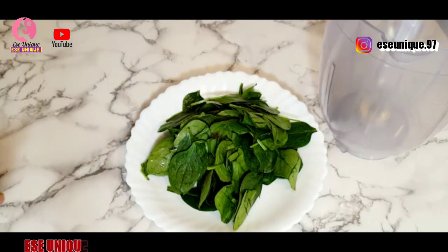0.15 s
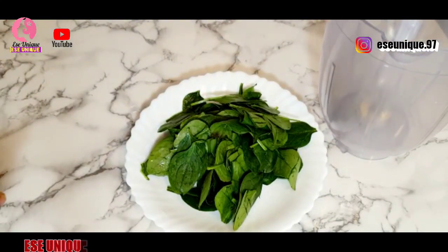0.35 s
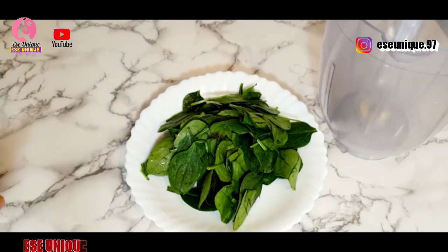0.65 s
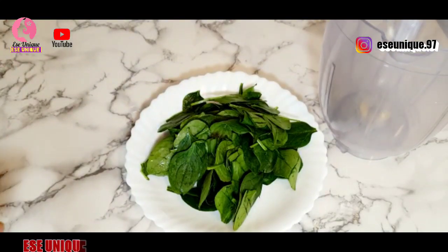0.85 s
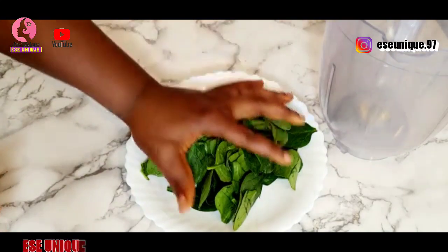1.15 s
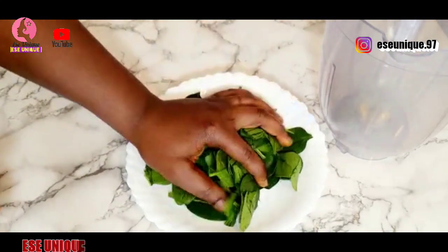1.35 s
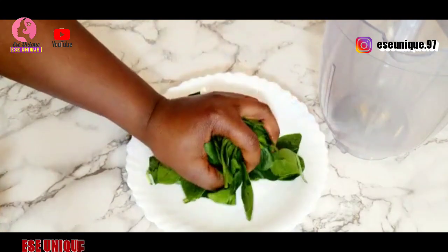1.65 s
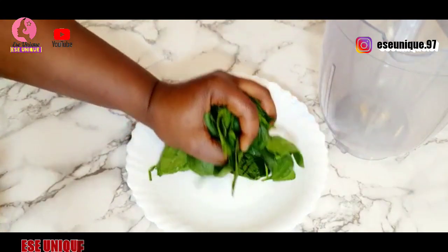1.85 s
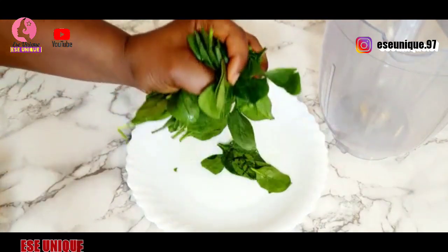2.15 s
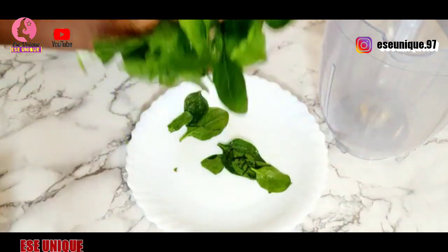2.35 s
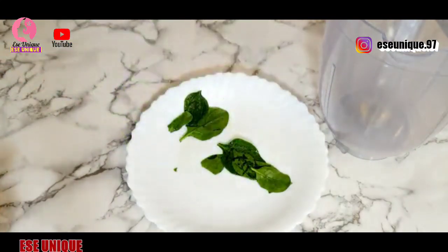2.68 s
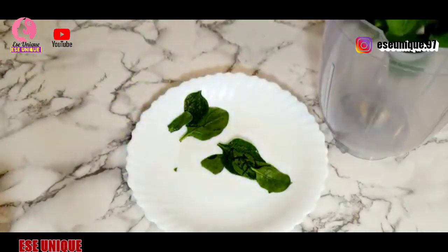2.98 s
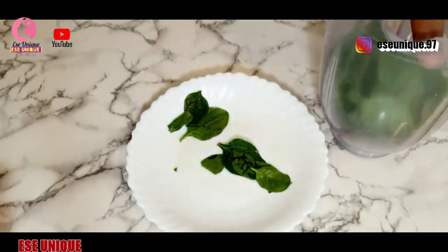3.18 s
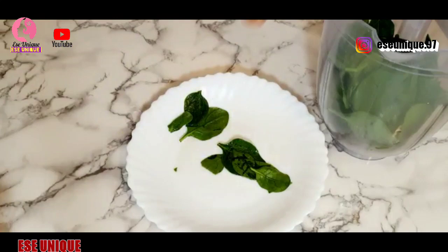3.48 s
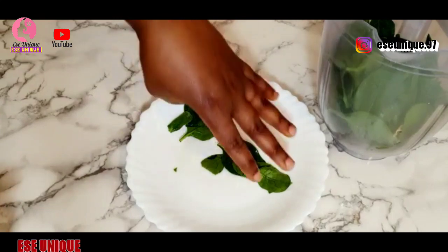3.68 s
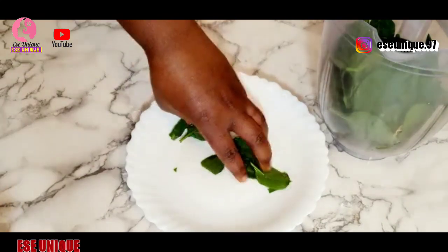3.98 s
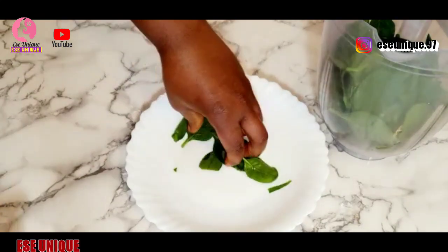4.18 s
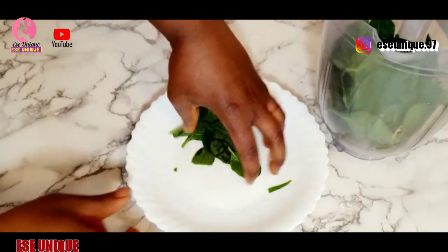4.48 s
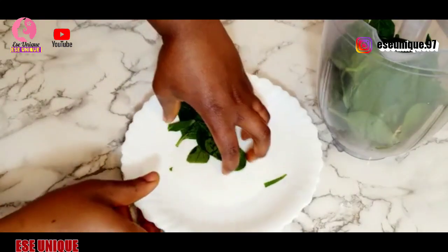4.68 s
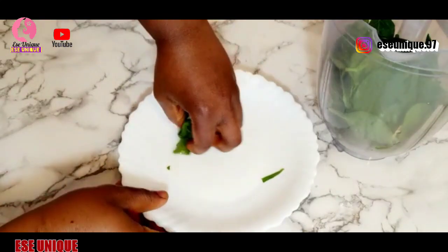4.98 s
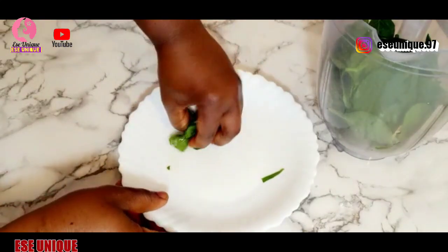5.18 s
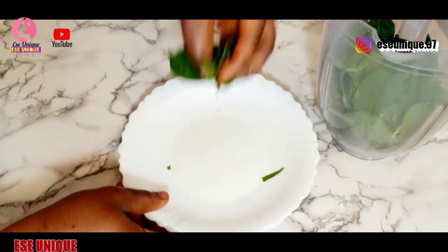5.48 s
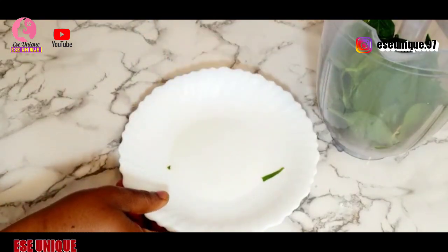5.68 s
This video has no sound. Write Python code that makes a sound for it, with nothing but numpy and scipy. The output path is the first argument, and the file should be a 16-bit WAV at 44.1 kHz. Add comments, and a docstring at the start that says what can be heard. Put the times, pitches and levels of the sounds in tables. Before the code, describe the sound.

Fresh leaves crunch and crackle in a squeezing hand, then drop into a plastic jar with a hollow clack and thud; a distant horn toots first.

```python
"""In a hard-walled kitchen, fresh spinach is gathered from a plate by hand and pushed into a plastic blender jar.
Leaves crackle as clouds of tiny filtered clicks, brighter as the fist closes; stems snap and crunch, wet leaves
squeak and the plate sings. The jar clacks and knocks hollowly, ringing worktop and room as decaying modes.
At the start a distant car horn toots twice in fluttering partials; later a faint tone sinks in pitch.
Low noise and the wavering hum of an appliance run throughout."""
import sys
import numpy as np
from scipy import signal
from scipy.fft import rfft, irfft
from scipy.io import wavfile
from scipy.ndimage import uniform_filter1d, map_coordinates

SR = 44100
rng = np.random.default_rng(int(sys.argv[2]) if len(sys.argv) > 2 else 0)


def materialize(psi):
    """Save the field psi as 16-bit PCM at rate SR to the path in sys.argv[1].

    A 1-D psi becomes a single channel; in a 2-D psi each row is a channel.
    """
    bounded = np.clip(np.atleast_2d(psi).T, -1, 1)
    quanta = np.round(bounded * 32767).astype(np.int16)
    wavfile.write(sys.argv[1], SR, quanta)


N = 257676
TIME = np.arange(N) / SR
RELEASE_DB_PER_S = 329.5  # leaves come to rest once the hand stops

# heavy and faint bumps on the counter: start_s, relative bump_db, highest pitch excited top_hz, relative boom_db
COUNTER_BUMPS = [(0.519, -17.5, 348, -23.5), (0.535, -36, 119.4, -10), (0.876, -22.5, 450, -28),
                 (0.887, -19.5, 170, -12), (0.92, -34, 111, -11), (3.136, -12, 392, -11.5),
                 (3.191, 3.5, 690, 0), (3.219, 4, 500, 0), (3.258, -2.5, 455, -3), (3.979, -32, 121, -25.5),
                 (4.525, -23, 149, -28)]


def amp(db):
    """Decibels to gain."""
    return 10 ** (np.asarray(db) / 20)


def unit(x):
    """Scale to rms 1."""
    return x / np.sqrt(np.mean(x ** 2) + 1e-20)


def at_hz(points, hz):
    """Read a table along a log-frequency axis."""
    f, value = np.transpose(points)
    return np.interp(np.log(hz + 1e-3), np.log(f), value)


def cut(x, hz, kind, order=2):
    """Butterworth filter."""
    sections = signal.butter(order, np.clip(hz, 10, .45 * SR), kind, fs=SR, output="sos")
    return signal.sosfilt(sections, x + 1e-18)


def drift(rate, size=N):
    """Smooth random motion with rms 1, passing `rate` random knots per second."""
    knots = rng.standard_normal(4096)
    coarse = map_coordinates(knots, [TIME[:size:16] * rate], order=3, mode="wrap")
    return unit(coarse).repeat(16)[:size]


def coloured(x, spectrum, size=4096):
    """Causal (minimum-phase) filter with the given spectrum shape and unit energy."""
    cepstrum = irfft(np.log(amp(at_hz(spectrum, np.fft.rfftfreq(size, 1 / SR)))))
    # folding the cepstrum forward makes the filter minimum-phase
    cepstrum[1:size // 2] *= 2
    cepstrum[size // 2 + 1:] = 0
    response = irfft(np.exp(rfft(cepstrum)))
    return signal.fftconvolve(x, response / np.linalg.norm(response))[:len(x)]


def diffuse(size):
    """Stereo noise from all round: alike in the bass, unrelated to slightly opposed in the treble."""
    # left-right likeness: pitch_hz, correlation (-1 to 1)
    likeness = [(60, 0.93), (130, 1), (260, 0.59), (500, 0.37), (900, 0.1), (2000, -0.068), (16000, -0.41)]
    alike = np.clip(at_hz(likeness, np.fft.rfftfreq(size, 1 / SR)), -1, 1)
    mid, side = rfft(rng.standard_normal((2, size)))
    return irfft(np.sqrt(1 + alike) * mid + np.sqrt(1 - alike) * side * [[1], [-1]], size)


def burst(t60, size=8192):
    """A contact: a dying run of tiny slips with unit energy."""
    slips = rng.choice([-1, 1], size) * rng.uniform(.5, 1, size)
    slips = slips * amp(-60 * TIME[:size] / max(t60, 1e-3))
    return slips / np.linalg.norm(slips)


def envelope(s, length_s, swell_s, release_db_per_s):
    """Swell evenly from time s, hold to the end of the length, then die away."""
    swell = np.clip((TIME - s) / max(swell_s, 1e-3), 0, 1)
    return swell * amp(-release_db_per_s * np.maximum(TIME - s - length_s, 0))


def add(track, s, sound):
    """Mix a sound in at time s."""
    start = max(round(s * SR), 0)
    track[..., start:start + sound.shape[-1]] += sound[..., :N - start]


def kitchen(x, wet_db, smear_s, pan_db, lag_s, gap_s=0.00069, swell_s=0.0047, size=32768):
    """Two spaced microphones hear the direct sound, then the room dying band by band."""
    # decay of the room: pitch_hz, t60_s
    room_decay = [(60, 0.56), (250, 0.37), (1000, 0.4), (4000, 0.31), (8000, 0.3), (16000, 0.3)]
    t, hz = TIME[:size], np.fft.rfftfreq(size, 1 / SR)
    noise, tail = rfft(diffuse(size)), 0
    edges = np.geomspace(20, SR / 2, 11)
    for low, high in zip(edges, edges[1:]):
        band = irfft(noise * ((hz >= low) & (hz < high)))
        tail = tail + band * amp(-60 * t / at_hz(room_decay, np.sqrt(low * high)))
    build_up = 1 - np.exp(-np.maximum(t - gap_s, 0) / swell_s)
    tail = unit(tail * build_up) / np.sqrt(size)
    # short waves reach each microphone by detours round hand and jar, each pitch a little late
    knots = np.linspace(0, SR / 2, num=40)
    detour = np.array([np.interp(hz, knots, rng.exponential(smear_s, len(knots)) * (knots > 0))
                       for _ in "LR"])
    late = detour + [[abs(lag_s)], [0]]  # the left side hears it later
    direct = irfft(np.exp(-2j * np.pi * np.cumsum(late, axis=1) * SR / size))
    direct[:, size // 2:] = 0
    panned = direct * amp([[pan_db / 2], [-pan_db / 2]])
    heard = signal.fftconvolve(np.atleast_2d(x), panned + amp(wet_db) * tail, axes=1)[:, :N]
    return heard / np.hypot(1, amp(wet_db))


def background(noise_db=-53.5, hum_db=6.0, waver=0.63):
    """Low room noise with an appliance's hum, each line wavering in strength and phase."""
    # spectrum shape of the room noise: pitch_hz, density_db per Hz
    noise_colour = [(12, -43), (20, -8), (48, 0.5), (70, -7), (107, 2.5), (170, -4.5), (225, -8.5),
                    (320, -6.5), (400, -11.5), (470, -16.5), (560, -14), (660, -15), (873, -24),
                    (1100, -29), (1400, -25), (2400, -28), (3200, -33), (16000, -45.5)]
    # hum lines of the appliance: pitch_hz, relative level_db
    hum_lines = [(102.3, -73), (355.3, -72.5), (446.8, -69), (495.3, -73), (656.8, -78.5), (1680, -87.5)]
    noise = unit(np.array([coloured(side, noise_colour) for side in diffuse(N)]))
    hum = 0
    for hz, db in hum_lines:
        wavering = 1 + waver * (drift(8.7) + 1j * drift(6.6))
        hum = hum + amp(db) * np.real(wavering * np.exp(2j * np.pi * hz * TIME))
    return amp(noise_db) * noise + amp(hum_db) * hum


def drone(level_db=-49.5, waver_db=2.0):
    """One faint, wavering tone swells, sinks in pitch and fades."""
    start_s, swell_s, fade_db_per_s = 5.03, 0.14, 29
    start_hz, sink_hz_per_s = 343, 13
    hz = start_hz - sink_hz_per_s * (TIME - start_s)
    shape = envelope(start_s, swell_s, swell_s, fade_db_per_s)
    return shape * amp(level_db + waver_db * drift(5.6)) * np.sin(2 * np.pi * np.cumsum(hz) / SR)


def horn(flutter_per_s=16, size=40000):
    """A far-off buzzing diaphragm sags as each toot ends; street echoes build up and partials flutter."""
    # toots: start_s, length_s, swell_s, relative level_db, brightening_db per partial above the third,
    # flutter share of the direct sound
    toots = [(0, .142, .003, -44, 0, .15), (.292, .158, .035, -48, 1.4, .35)]
    # partials: multiple of the pitch, relative direct_db, relative street echo_db
    partials = [(1, -12, -12), (2, -19, -11), (3, -1, -17), (4, -9, -17), (5, -22, -25), (6, -30, -32),
                (7, -37, -37)]
    pitch_hz, release_db_per_s = 432.5, 600
    sag_hz_per_s, sag_s = 450, .025
    echo_release_db_per_s, echo_flutter = 170, .6
    # the direct sound of the middle partials dips briefly during the second toot
    dip_s, dip_width_s, dipping = .402, .022, (3, 4)
    out, t = np.zeros((2, N)), TIME[:size]
    for s, length_s, swell_s, db, bright_db, flutter_share in toots:
        loud = envelope(s, length_s, swell_s, release_db_per_s)[:size]
        echo = envelope(s, length_s + sag_s, length_s, echo_release_db_per_s)[:size]
        sag = np.cumsum(sag_hz_per_s * np.clip(t - s - length_s + sag_s / 2, 0, sag_s)) / SR
        for k, direct_db, echo_db in partials:
            flutter = np.array([drift(flutter_per_s, size) + 1j * drift(flutter_per_s, size) for _ in "LR"])
            dip = 1 - (k in dipping) * np.exp(-((t - dip_s) / dip_width_s) ** 2)
            direct = amp(direct_db) * dip * loud * (1 + flutter_share * flutter)
            direct = direct * np.exp(-2j * np.pi * k * sag)
            reflected = amp(echo_db) * echo * (1 - echo_flutter + echo_flutter * flutter[::-1])
            arriving = direct + 1j * reflected
            partial = arriving * np.exp(2j * np.pi * (k * pitch_hz * t + rng.random()))
            add(out, 0, np.sqrt(2) * amp(db + bright_db * max(k - 3, 0)) * np.real(partial))
    return out


def boom(level_db=-14.0, swell_s=0.0043, port_lag_s=0.00023, size=40000):
    """After each bump the standing waves of counter and room build up and ring on."""
    # modes of counter and room: pitch_hz, relative level_db, t60_s
    room_modes = [(51.7, -19.5, 0.55), (101.1, -5, 0.51), (111.8, 0, 0.14), (177.6, -13, 0.48),
                  (211, -6.5, 0.26), (259.2, -5, 0.33), (329.2, -1.5, 0.27), (364, -8.5, 0.4),
                  (444.8, -2.5, 0.36), (500.4, -4, 0.35), (566, -16, .42), (738, -17, 0.43),
                  (916, -22, 0.27)]
    out, t = np.zeros((2, N)), TIME[:size]
    at_ports = t - np.array([[port_lag_s], [0]])  # the left side hears it later
    for s, _, top_hz, boom_db in COUNTER_BUMPS:
        for hz, mode_db, t60 in room_modes:
            strength = amp(boom_db + mode_db + level_db) / np.hypot(1, (hz / top_hz) ** 3)
            shape = (1 - np.exp(-t / swell_s)) * amp(-60 * t / t60)
            add(out, s, strength * shape * np.sin(2 * np.pi * (hz * at_ports + rng.random())))
    return out


def knocks(swell_s=0.0032, size=16384):
    """A light knock rings the low modes of the worktop, weakening above its own highest pitch."""
    # knocks: start_s, relative level_db, highest pitch excited top_hz
    light_knocks = [(0.519, -39, 600), (0.556, -44, 450), (0.891, -34.5, 560), (0.928, -38.5, 480)]
    # worktop resonances: pitch_hz, relative level_db, t60_s
    worktop_modes = [(172.4, 2, .13), (349, -1.5, 0.155), (461, -4, 0.2), (627, -8.5, .1), (870, -15, .15)]
    out, t = np.zeros(N), TIME[:size]
    for s, db, top_hz in light_knocks:
        for hz, mode_db, t60 in worktop_modes:
            strength = amp(db + mode_db) / np.hypot(1, (hz / top_hz) ** 3)
            shape = (1 - np.exp(-t / swell_s)) * amp(-60 * t / t60)
            add(out, s, strength * shape * np.sin(2 * np.pi * (hz * t + rng.random())))
    return out


def thuds(level_db=28.0, contact_s=0.022):
    """Dull contacts on the counter, heavy and faint, each muffled above its own highest pitch."""
    # spectrum shape of a bump: pitch_hz, density_db per Hz
    bump_colour = [(45, -23), (90, -2.5), (160, -5), (250, -2), (520, 0.5), (800, -4.5), (1400, -1.5),
                   (2600, 9.5), (4000, 5.5), (7000, -5)]
    out = np.zeros(N)
    for s, bump_db, top_hz, _ in COUNTER_BUMPS:
        push = unit(coloured(burst(contact_s), bump_colour))
        push = push / np.sqrt(len(push))  # unit energy
        add(out, s, amp(bump_db + level_db) * cut(push, top_hz, "low"))
    return out


def hollow(level_db=-6.0, size=16384):
    """The landing jar knocks hollowly, its tones sliding down as the leaves pack down."""
    # hollow tones: start pitch_hz, relative level_db, swell_s, t60_s, fall in octaves per s
    hollow_modes = [(276, 1, 0.0007, 0.062, 0.505), (440, -3.5, 0.00083, 0.073, 1.6),
                    (774.5, -5.5, 0.027, 0.3, 13), (1074, -12.5, 0.00084, .05, 1.5),
                    (1150, -18.5, .03, 0.25, 5.7), (1424, -17.5, 0.013, 0.15, 2.7),
                    (2210, -9.5, 0.001, 0.03, 1.5), (2910, -8, .001, 0.038, 1.5),
                    (3680, -10, .001, 0.042, 1)]
    landing_s = 3.1917
    out, t = np.zeros(N), TIME[:size]
    for hz, db, swell_s, t60, fall in hollow_modes:
        turns = np.cumsum(hz * 2 ** (-fall * t)) / SR
        shape = (1 - np.exp(-t / swell_s)) * amp(level_db + db - 60 * t / t60)
        add(out, landing_s, shape * np.sin(2 * np.pi * turns))
    return out


def jar_clacks(level_db=13.0, ring_db=-15.0, size=16384):
    """Plastic chatters against a hard edge and the jar wall rings briefly."""
    # hard plastic contacts: start_s, relative chatter_db, chatter t60_s, relative wall ring_db
    contacts = [(0.517, -37, 0.3, -33.5), (0.874, -22.5, 0.28, -38), (0.882, -24.5, 0.041, -34),
                (3.1331, -4, 0.036, -1), (3.1912, -13, 0.026, -17), (3.224, -15, 0.23, -20)]
    # resonances of the jar wall: pitch_hz, relative level_db, t60_s
    wall_modes = [(1407, -11.5, 0.067), (1797, -11.5, 0.046), (3290, 2, 0.055), (3670, -11.5, 0.047),
                  (4020, -4, 0.035), (4550, -3.5, .04), (4850, -8.5, 0.036)]
    # spectrum shape of the chatter: pitch_hz, density_db per Hz
    chatter_colour = [(500, -36), (1000, -11), (1400, -2.5), (1800, 4), (2500, -6), (3200, 5.5),
                      (3800, 3.5), (4600, 0), (5600, -6), (8300, -9.5), (12000, -16), (16000, -25.5)]
    out, t = np.zeros(N), TIME[:size]
    for s, db, chatter_s, wall_db in contacts:
        add(out, s, amp(db + level_db) * coloured(burst(chatter_s), chatter_colour))
        wall = 0
        for hz, mode_db, t60 in wall_modes:
            wall = wall + amp(mode_db - 60 * t / t60) * np.sin(2 * np.pi * hz * t) * rng.choice([-1, 1])
        add(out, s, amp(wall_db + ring_db) * wall)
    return out


def plate_rub(level_db=1.0, judder_db=4.0):
    """The last leaves drag over the bare plate; their juddering friction keeps it faintly singing."""
    # slides: start_s, length_s, swell_s, relative level_db
    slides = [(4.065, 0.17, .04, -63.5), (4.50, 0.24, 0.025, -65), (4.70, 0.093, .05, -54.5),
              (4.814, .40, 0.072, -52.5)]
    # plate resonances: pitch_hz, width_hz, relative level_db
    plate_modes = [(2165, 110, 7.5), (3780, 170, 2), (5100, 200, -15.5), (6230, 450, 4), (7520, 210, -8)]
    sliding = sum(amp(db) * envelope(s, length_s, swell_s, RELEASE_DB_PER_S)
                  for s, length_s, swell_s, db in slides)
    friction = rng.standard_normal(N) * amp(judder_db * drift(50))
    song = 0
    for hz, width, mode_db in plate_modes:
        ringing = signal.lfilter(*signal.iirpeak(hz, hz / width, fs=SR), friction)
        song = song + amp(mode_db) * unit(ringing)
    return unit(song) * amp(level_db) * sliding


def squeaks(level_db=1.5, jitter=0.029):
    """A wet leaf sticks and slips so fast under the fingers that it chirps at an unsteady pitch."""
    # chirps: start_s, length_s, centre pitch_hz, relative level_db
    chirps = [(4.099, 0.017, 3790, -45.5), (4.12, 0.016, 3710, -48), (4.138, 0.022, 3780, -60),
              (4.196, 0.022, 3780, -62), (4.913, 0.011, 4360, -39), (4.978, 0.022, 3105, -28.5),
              (4.995, 0.014, 3340, -34), (5.152, 0.015, 2950, -43)]
    out = np.zeros(N)
    for s, length_s, hz, db in chirps:
        swell = signal.windows.hann(round(length_s * SR))
        pitch = hz * (1 + jitter * drift(546)[:len(swell)])
        add(out, s, amp(db + level_db) * swell * np.sin(2 * np.pi * np.cumsum(pitch) / SR))
    return out


def snaps(level_db=-7.0, splinter_db=-27):
    """A juicy stem cracks around its own pitch, too small to radiate much below that."""
    # snapping stems and ribs: start_s (the crack follows 1 ms later), relative peak_db, pitch_hz
    stem_breaks = [(1.264, -24, 2354), (1.3087, -15, 5000), (1.3317, -23, 5000), (1.3661, -16, 8000),
                   (1.4095, -14.5, 3800), (1.4635, -8, 5000), (1.4965, -8.5, 1091), (1.4975, -7, 4380),
                   (1.583, -13, 4800), (1.6293, -9, 2310), (1.669, -9, 2890), (1.709, -12, 2580),
                   (1.7313, -9, 4000), (1.7507, -5.5, 5410), (1.7722, -15, 6000), (1.78, -9, 6200),
                   (1.8555, -19.5, 1980), (1.9151, -27, 2970), (2.0477, -28, 5500), (2.74, -26.5, 4540),
                   (2.856, -25, 5076), (3.0201, -24, 3305), (3.0605, -24, 3250), (3.0954, -22, 1830),
                   (3.2258, -15, 5000), (3.232, -13, 5000), (3.2702, -16, 3200), (4.0696, -37, 7000),
                   (4.8429, -32, 7000), (4.8698, -26, 6000), (4.9696, -7.5, 4200), (5.034, -19, 4600),
                   (5.058, -23, 4900), (5.0947, -20, 4600), (5.1183, -6.5, 3700), (5.1946, -25, 4200)]
    out = np.zeros(N)
    for s, peak_db, hz in stem_breaks:
        tear = burst(.012)
        body = cut(tear, [hz / np.sqrt(2), hz * np.sqrt(2)], "band", order=1)
        crack = cut(body + amp(splinter_db) * tear, .62 * hz, "high", order=3)
        add(out, s + .001, crack / np.abs(crack).max() * amp(peak_db + level_db))
    return out


def crunches(per_s=1100, size_db=2.5, cycles=7.0, size=512):
    """Stems grind in a quick, uneven run of slips, each ringing for a few cycles near a gliding pitch."""
    # grinding stems: start_s, length_s, swell_s, start pitch_hz, end pitch_hz, relative level_db
    grinds = [(1.383, 0.14, .02, 1080, 950, -39.5), (1.613, .068, .008, 2850, 2450, -29.5),
              (1.699, 0.083, .02, 3400, 6500, -33)]
    release_db_per_s = 700.5
    out, t = np.zeros(N), TIME[:size]
    for s, length_s, swell_s, start_hz, end_hz, db in grinds:
        run = np.zeros(N)
        # slips go on for twice the length, to fill the release; all three draws span 0 to 2
        for when, strength, detune in rng.random((round(2 * per_s * length_s), 3)) * 2:
            hz = start_hz * (end_hz / start_hz) ** min(when, 1)
            hz = hz * 2 ** ((detune - 1) / 5)
            slip = amp(size_db * strength ** 2 - 60 * t * hz / cycles) * np.sin(2 * np.pi * hz * t)
            add(run, s + when * length_s, slip)
        run = unit(run) * np.sqrt(2 * length_s * SR / N)  # short runs are not boosted
        out += amp(db) * run * envelope(s, length_s, swell_s, release_db_per_s)
    return cut(out, 700, "high")


def wander(x, wander_s=.00013, wander_per_s=45):
    """The crackle comes from one leaf, then another, so its lead at either microphone keeps changing."""
    lead = wander_s * SR * uniform_filter1d(drift(wander_per_s), size=32)
    return np.array([map_coordinates(x, [np.arange(N) + side * lead], order=3, mode="nearest")
                     for side in (1, -1)])


def effort(which):
    """Strength of the crackle and of the rubbing, summed in power over the strokes on these leaves."""
    # hand strokes: start_s, length_s, swell_s, relative crackle_db, relative dull rubbing_db, which leaves
    # (pile: full plate, fist: closing hand, jar: pushed in, last: last leaves)
    strokes = [(1.119, 0.066, 0.055, -44, -61, "pile"), (1.231, 0.1, 0.092, -35.5, -50, "pile"),
               (1.306, 0.16, 0.13, -26, -39.5, "pile"), (1.482, 0.11, 0.0095, -27.5, -36, "pile"),
               (1.569, 0.18, .06, -24.5, -45.5, "fist"), (1.749, 0.019, 0.018, -33, -44.5, "fist"),
               (1.812, 0.24, 0.025, -59.5, -58, "fist"), (2.643, 0.1, 0.014, -64, -77, "jar"),
               (2.716, 0.031, 0.022, -49.5, -53, "jar"), (2.757, 0.21, 0.19, -42, -45.5, "jar"),
               (2.988, 0.084, 0.019, -44, -35.5, "jar"), (3.079, 0.075, 0.0095, -38, -45.5, "jar"),
               (3.788, 0.27, 0.19, -65, -70, "last"), (4.021, .18, 0.035, -55, -56.5, "last"),
               (4.253, 0.11, 0.031, -59.5, -73, "last"), (4.483, 0.56, 0.022, -62, -47, "last"),
               (4.675, 0.26, 0.16, -44, -39, "last"), (4.961, 0.052, 0.0037, -38, -46.5, "last"),
               (5.035, 0.19, 0.026, -47.5, -51.5, "last"), (5.786, 0.054, 0.042, -58, -56.5, "last")]
    settle_db, settle_db_per_s = -26.5, 49  # a few leaves go on unfolding, far more quietly
    power = np.zeros((2, N))
    for s, length_s, swell_s, crackle_db, dull_db, name in strokes:
        if name == which:
            moving = envelope(s, length_s, swell_s, RELEASE_DB_PER_S)
            unfolding = amp(settle_db) * envelope(s, length_s, swell_s, settle_db_per_s)
            power += (amp([[crackle_db], [dull_db]]) * (moving + unfolding)) ** 2
    return np.sqrt(power)


def leaves(which, colour, rub_colour, level_db, crisp_db, rub_db, per_s, clump_db, size_db, tick_db):
    """Leaf skins stick and slip in tiny clicks, more as the grip tightens; the hand rubs dully below."""
    grip, rubbing = effort(which)
    rate = per_s * np.sqrt(np.maximum(grip / grip.max(), .003))
    sizes = amp(size_db * np.minimum(rng.exponential(1, N), 4)) * rng.choice([-1, 1], N)
    # dividing by the root of the rate leaves the loudness to the grip
    clicks = unit(sizes * (rng.random(N) < rate / SR) / np.sqrt(rate)) * amp(clump_db * drift(160))
    # a dense scatter of sharper, slightly longer ticks among the clicks
    ticks_per_s, tick_spread_db = 280, 3.0
    ticks = (rng.random(N) < ticks_per_s / SR) * amp(tick_spread_db * rng.uniform(-0.91, 1, N))
    clicks = clicks + amp(tick_db) * unit(signal.fftconvolve(ticks, burst(0.0033))[:N])
    # every fold has its own pitch, so the bands swell and fade separately
    edges, folds = np.geomspace(300, 17000, 13), 0
    for low, high in zip(edges, edges[1:]):
        folds = folds + cut(clicks, [low, high], "band", order=1) * amp(3 * drift(140))
    crackle = unit(coloured(folds, colour))
    crisp = unit(cut(crackle, 7000, "high", order=3)) * amp(crisp_db)
    crackle = cut(crackle, 7000, "low", order=3) + crisp
    rub = unit(coloured(rng.standard_normal(N), rub_colour))
    return crackle * grip * amp(level_db) + rub * rubbing * amp(rub_db)


def scene():
    """Plate near the middle, jar to the right, in one room; boom, horn, drone and background join after."""
    # crackle colour of the gathered pile: pitch_hz, density_db per Hz
    grab_colour = [(250, -11), (360, -4), (480, -6.5), (720, -8.5), (950, 1.5), (1200, -1.5), (1500, -3),
                   (2300, 0), (4400, -2), (7500, -10.5), (14500, -15), (16000, -25.5)]
    # crackle colour in the closing fist: pitch_hz, density_db per Hz
    squeeze_colour = [(250, -10), (350, -4), (620, -7.5), (920, -2), (1200, -3), (1700, -1.5), (2250, 0),
                      (3300, -1.5), (4500, -4), (5700, -2.5), (7500, -8.5), (14500, -11), (16000, -26.5)]
    # crackle colour inside the jar: pitch_hz, density_db per Hz
    jar_colour = [(290, -2.5), (500, -14), (750, -17), (1000, -9.5), (1250, -5), (1800, -7), (3290, -4),
                  (5000, -8), (14700, -13), (16000, -26.5)]
    # crackle colour of the last leaves: pitch_hz, density_db per Hz
    last_colour = [(500, -2.5), (680, -4.5), (900, -29.5), (1200, -1.5), (1600, -3), (2200, -3.5),
                   (3100, 2), (4200, -1.5), (6500, -2), (9000, -4), (12000, -5), (14500, -6), (16000, -28)]
    # the hand rubbing through the full pile: pitch_hz, density_db per Hz
    pile_rub_colour = [(15, -49.5), (25, 3), (49, 6.5), (160, 0.5), (190, -5), (262, -9.5), (360, 1),
                       (393, -8), (435, -1.5), (533, -15), (800, -16), (1040, -21.5), (1760, -120)]
    # the hand rubbing on the bare plate: pitch_hz, density_db per Hz
    plate_rub_colour = [(15, -51.5), (28, 4), (48, 4), (75, 3), (165, 0), (260, -9), (360, -1.5), (450, -7),
                        (560, -11), (800, -13.5), (1040, -21.5), (1760, -120)]

    grab = leaves("pile", grab_colour, pile_rub_colour, level_db=0.0, crisp_db=-8.0, rub_db=-3.5,
                  per_s=4500, clump_db=1.0, size_db=3.5, tick_db=-8.5)
    squeeze = leaves("fist", squeeze_colour, pile_rub_colour, level_db=-1.5, crisp_db=-7.0, rub_db=-2.5,
                     per_s=4500, clump_db=1.5, size_db=4.0, tick_db=-8)
    stuffing = leaves("jar", jar_colour, pile_rub_colour, level_db=2.5, crisp_db=-11.5, rub_db=-0.5,
                      per_s=3500, clump_db=1.0, size_db=0.0, tick_db=-10.0)
    last = leaves("last", last_colour, plate_rub_colour, level_db=-1.0, crisp_db=-8.5, rub_db=-0.5,
                  per_s=5000, clump_db=1.5, size_db=4.0, tick_db=-9.5)

    # wet_db: room against direct sound; pan_db: left against right, so negative lies to the right
    worktop = kitchen(knocks(), wet_db=-10.0, smear_s=.0001, pan_db=1.0, lag_s=.0002)
    counter = kitchen(thuds(), wet_db=4.5, smear_s=0.00017, pan_db=-0.5, lag_s=0.00028) + boom()
    jar = kitchen(jar_clacks() + hollow(), wet_db=-4.5, smear_s=0.0001, pan_db=-6.0, lag_s=.00003)
    in_jar = kitchen(wander(stuffing), wet_db=-2.0, smear_s=0.00025, pan_db=-4.0, lag_s=.0002)
    stems = kitchen(snaps(), wet_db=-5.5, smear_s=.00008, pan_db=-3.0, lag_s=0)
    bare_plate = kitchen(wander(last) + plate_rub() + squeaks(),
                         wet_db=-4.0, smear_s=0.00028, pan_db=-1.0, lag_s=0)
    full_plate = kitchen(wander(grab + squeeze + crunches()),
                         wet_db=-2.5, smear_s=.0002, pan_db=-2.5, lag_s=.00006)
    surroundings = background() + drone() + horn()
    return surroundings + worktop + counter + jar + in_jar + stems + bare_plate + full_plate


def record(dry):
    """The microphones lose the deepest bass, the highest peaks are rounded and the top is cut."""
    rounded = np.tanh(cut(dry, 37, "high", order=6) / 1.05) * 1.05
    top_cut = signal.ellip(10, .1, 80, 15900, fs=SR, output="sos")
    return signal.sosfilt(top_cut, rounded)


dry = scene()
out = record(dry)
materialize(out)
```